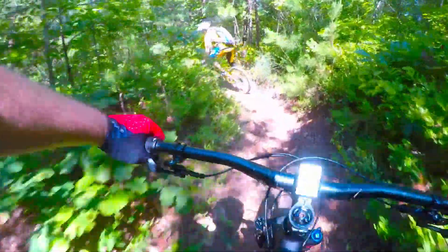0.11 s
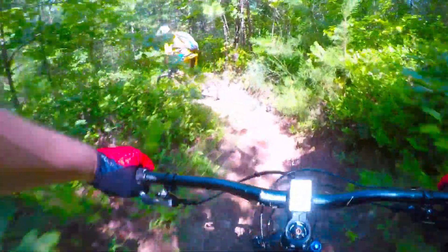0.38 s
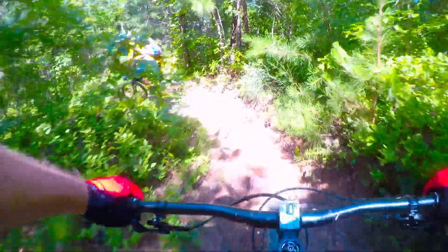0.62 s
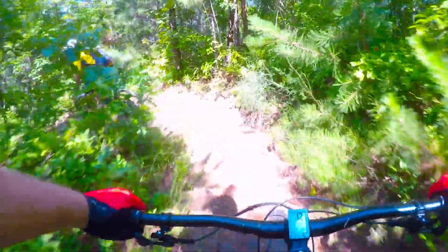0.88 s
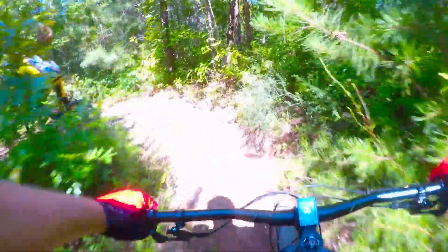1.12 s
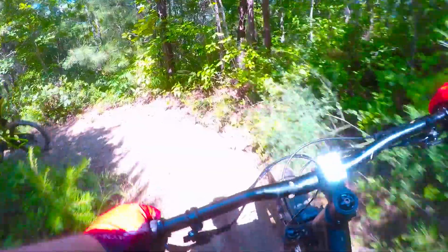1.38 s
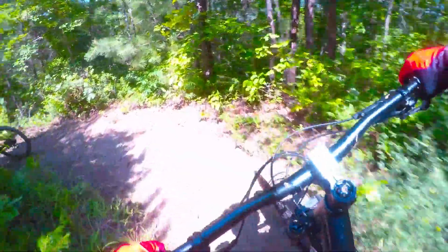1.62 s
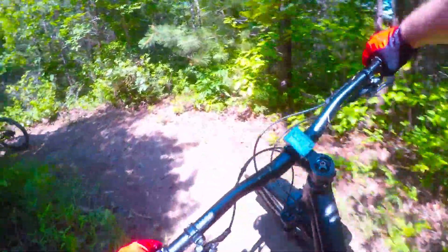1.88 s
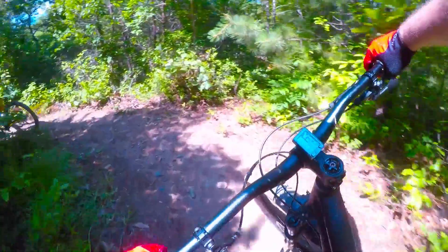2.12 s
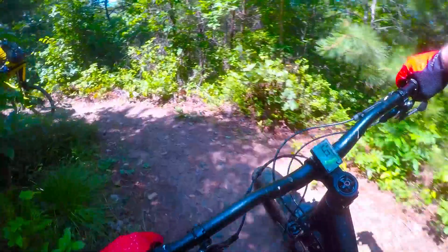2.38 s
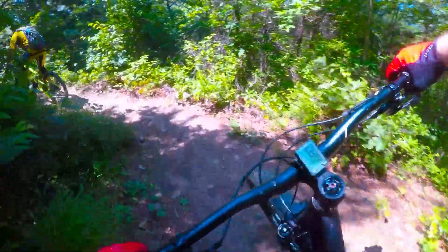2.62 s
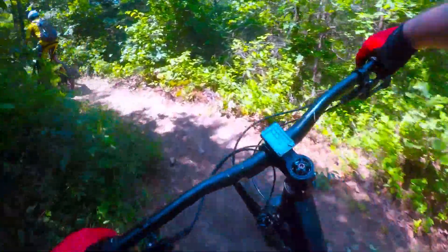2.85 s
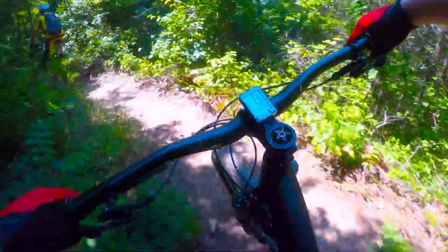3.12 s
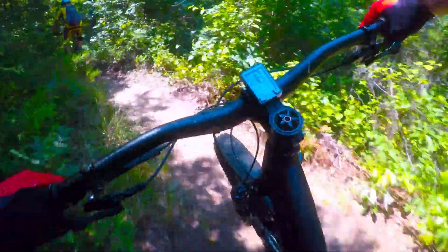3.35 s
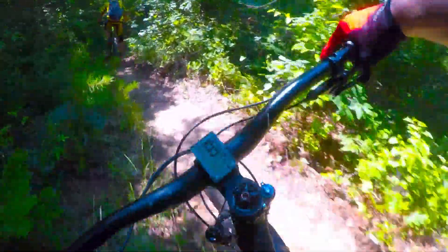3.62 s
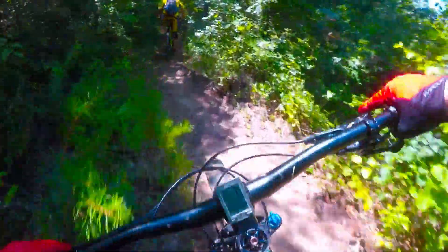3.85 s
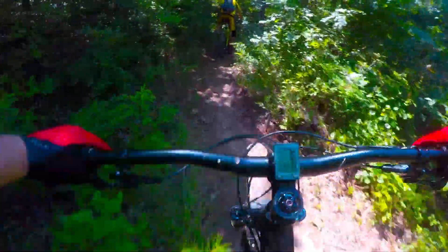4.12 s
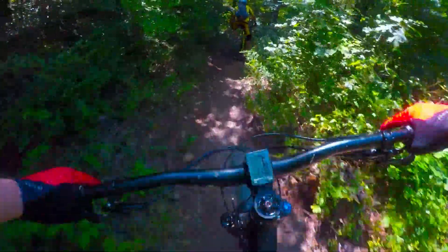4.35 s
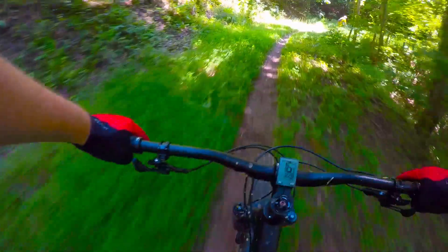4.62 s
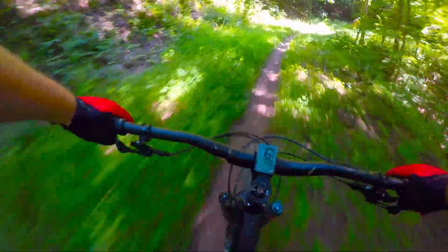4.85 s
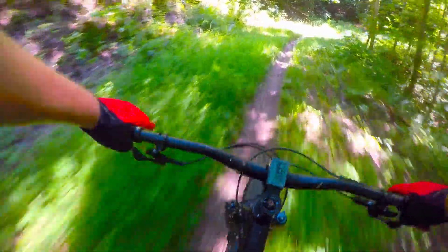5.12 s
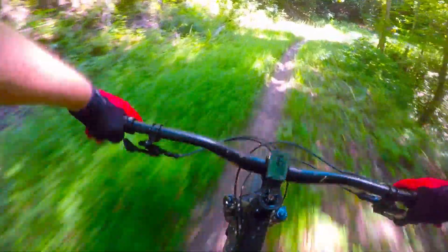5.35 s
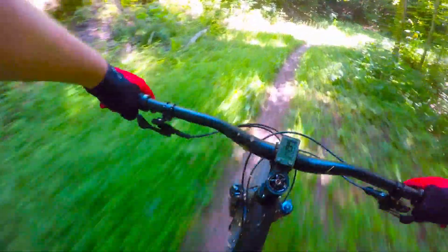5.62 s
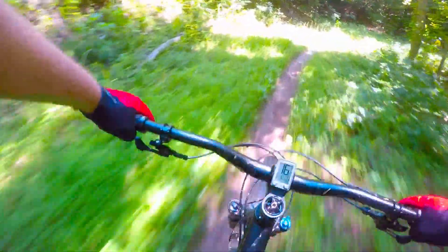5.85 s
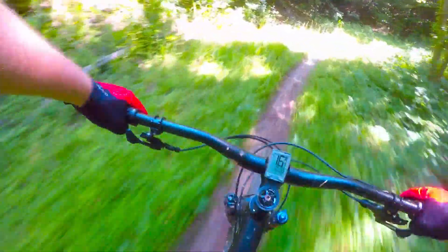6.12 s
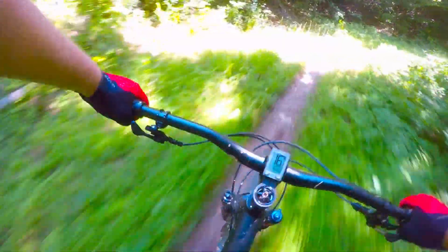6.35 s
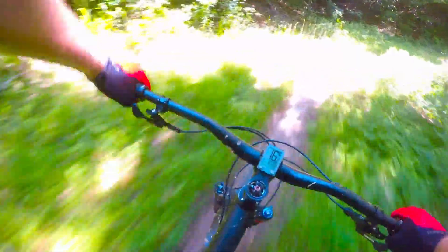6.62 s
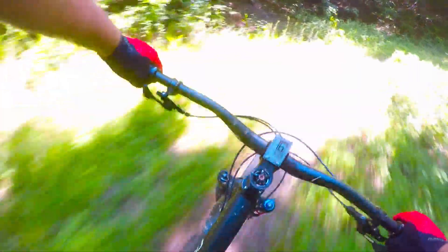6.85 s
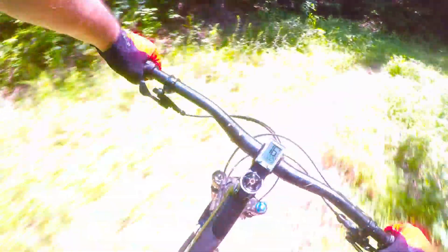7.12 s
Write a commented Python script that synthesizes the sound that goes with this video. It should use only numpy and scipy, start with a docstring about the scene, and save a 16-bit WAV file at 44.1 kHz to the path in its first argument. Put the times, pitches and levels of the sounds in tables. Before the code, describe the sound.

Close on a mountain bike from the rider's chest, outdoors in woods. Tyres crunch dirt softly, the chain whirrs, the brake chirps thinly, then the freehub ticks through a bend. Pedalling briefly returns before a hard cut to a fast straight: wind thumps heavily against the microphone, the ratchet ticks rapidly and stones knock the frame.

```python
"""A mountain bike heard from the rider's chest: a slow bend on dirt, then at 4.6 s a cut to a fast grassy straight.
The brake disc chirps (thin noise rings) over a whirring chain (resonant noise), then the freehub ticks as the
rider coasts (pulsed noise); the chain returns before the cut, and fast coasting ticks follow it.
Throughout, wind buffets the housing (low noise in puffs), knobbly tyres crunch grit (patchy noise and pops),
and stones knock the frame (decaying sines with a crack) while chain and cables slap (noise bursts)."""
import sys
import numpy as np
from scipy import signal
from scipy.fft import rfft, irfft
from scipy.io import wavfile
from scipy.ndimage import uniform_filter1d

SR = 44100
rng = np.random.default_rng(int(sys.argv[2]) if len(sys.argv) > 2 else 0)


def generate_wav(sig):
    """Save sig (samples, or channels by samples) to the path in sys.argv[1] as 16-bit PCM at SR."""
    pcm = np.round(np.clip(np.atleast_2d(sig).T, -1, 1) * 32767).astype(np.int16)
    wavfile.write(sys.argv[1], SR, pcm)


def gain_from_decibels(decibels):
    """Convert decibel values to linear amplitude factors."""
    exponent = np.asarray(decibels, float) / 20
    return 10 ** exponent


N = 318843
T = np.arange(N) / SR


def level(x, db=0):
    """Scale to an rms level."""
    return x * gain_from_decibels(db) / np.sqrt(np.mean(x ** 2))


def curves(spells):
    """Join tables in time and draw each column after the first as a curve, one value a sample."""
    s, *columns = np.vstack(spells).T
    return [np.interp(T, s, column) for column in columns]


def colour(x, points, modes=()):
    """Minimum-phase filter through (Hz, dB) points with resonance humps on top; the result has rms 1."""
    size = 8192
    f = np.arange(size // 2 + 1) * SR / size + 1
    hz, db = np.transpose(points)
    db = np.interp(np.log(f), np.log(hz), db)
    for centre, width, lift_db in modes:
        db = db + lift_db / (1 + (2 * (f - centre) / width) ** 2)
    # folding the cepstrum forward in time makes the filter causal
    cepstrum = irfft(np.log(gain_from_decibels(db)))
    cepstrum[1:size // 2] *= 2
    cepstrum[size // 2 + 1:] = 0
    impulse = irfft(np.exp(rfft(cepstrum)))
    return level(signal.fftconvolve(x, impulse[None], axes=1)[:, :N])


# how far the two channels differ: (frequency [Hz], difference against the sum [dB])
CHANNEL_DIFFERENCE = [(40, -42.5), (120, -37), (350, -28), (1000, -30.5), (2500, -27), (5000, -24.5),
                      (11600, -20), (11800, -0.5)]


def hiss():
    """Two channels of noise: nearly alike, independent above about 11.6 kHz."""
    mid, side = rfft(rng.standard_normal((2, N)))
    hz, db = np.transpose(CHANNEL_DIFFERENCE)
    f = np.arange(len(mid)) * SR / N + 1
    share = gain_from_decibels(np.interp(np.log(f), np.log(hz), db))
    opposed = share * side * np.array([[1], [-1]])
    return irfft((mid + opposed) / np.sqrt(1 + share ** 2), N)


def walk(rate):
    """Random levels held 1 / rate s and slewed twice; spread near 1."""
    hold = int(SR / rate)
    steps = np.repeat(rng.standard_normal(N // hold + 1), hold)
    return 1.28 * uniform_filter1d(uniform_filter1d(steps, hold), hold)[:N]


def strikes(times, sizes, rise_s, t60_s):
    """Envelope of blows: a short rise, then an exponential fall, cut after 4096 samples."""
    spikes = np.bincount(np.clip((times * SR).astype(int), 0, N - 1), sizes, N)
    t = np.arange(4096) / SR
    blow = (1 - np.exp(-t / rise_s)) * 1000. ** (-t / t60_s)
    return signal.fftconvolve(spikes, blow)[:N]


def add(out, s, sound):
    """Mix a short sound in at time s."""
    i = int(s * SR)
    out[..., i:i + sound.shape[-1]] += sound[..., :N - i]


def band(x, hz, width):
    """Steep band-pass: a resonance applied twice, gain 1 at the centre."""
    b, a = signal.iirpeak(hz, hz / width, SR)
    return signal.lfilter(b, a, signal.lfilter(b, a, x))


# wind on the housing, slow bend then fast straight:
# (time [s], buffet level [dB], flutter level [dB], whoosh level [dB])
WIND_LEVELS = [
    [(0.0, -36.5, -41, -52), (0.3, -36, -42, -57.5), (0.72, -32, -41.5, -52), (0.8, -39, -44, -50.5),
     (1.1, -32, -39.5, -48.5), (1.25, -28, -34, -44.5), (1.4, -34, -40, -46), (1.75, -33, -42, -52),
     (2.4, -36.5, -43, -52.5), (3.0, -33, -42, -45.5), (3.4, -33, -40.5, -51), (3.8, -30, -42.5, -50.5),
     (4.05, -35.5, -41, -54), (4.27, -29, -35.5, -49), (4.46, -42, -43, -51), (4.59, -38, -39, -52)],
    [(4.6, -19, -24.5, -41), (4.63, -18, -24.5, -40), (4.77, -23.5, -23.5, -43.5),
     (4.93, -13.5, -23.5, -38), (5.12, -24, -22, -41.5), (5.26, -13, -18, -32), (5.42, -22, -27.5, -37.5),
     (5.92, -17, -23, -38.5), (6.3, -19, -20, -36.5), (6.47, -14, -23, -37.5), (6.62, -18.5, -22, -39),
     (6.76, -11, -20, -38), (6.84, -23.5, -22, -33.5), (6.95, -14, -23.5, -35.5), (7.23, -19, -26, -35.5)],
]
# spectra of the three wind layers: (frequency [Hz], relative density [dB per Hz])
BUFFET_SPECTRUM = [(5.9, -39.5), (10, -1), (37, 1.5), (100, -8.5), (130, -42), (220, -120)]
FLUTTER_SPECTRUM = [(47, -27), (80, -2.5), (176, -2), (290, -17.5), (380, -48), (640, -120)]
WHOOSH_SPECTRUM = [(150, -25), (250, 2.5), (361, -5), (451, -13), (505, -15), (540, -38.5), (700, -51.5),
                   (1190, -120)]


def wind():
    """Eddies press on the housing: slow buffets, a faster flutter in puffs and a whoosh over the ports."""
    puff_db, puffs_per_s = 1, 9.  # spread and pace of the random puffs in the buffets
    buffet_db, flutter_db, whoosh_db = curves(WIND_LEVELS)
    buffet = colour(gain_from_decibels(puff_db * walk(puffs_per_s)) * hiss(), BUFFET_SPECTRUM)
    flutter = colour(gain_from_decibels(1.3 * walk(30) + 0.76 * walk(puffs_per_s)) * hiss(), FLUTTER_SPECTRUM)
    whoosh = colour(gain_from_decibels(1.0 * walk(40) + 3.1 * walk(puffs_per_s)) * hiss(), WHOOSH_SPECTRUM)
    return gain_from_decibels(buffet_db) * buffet + gain_from_decibels(flutter_db) * flutter + gain_from_decibels(whoosh_db) * whoosh


# tyre roar on the ground, slow then fast: (time [s], level [dB])
ROAR_LEVELS = [(0.0, -47.5), (0.92, -52), (1.5, -46), (1.77, -51.5), (2.16, -51), (2.91, -55), (3.96, -50),
               (4.58, -49.5), (4.6, -47.5), (5.5, -42), (5.88, -45), (7.23, -40.5)]
# tyre roar spectrum: (frequency [Hz], relative density [dB per Hz])
ROAR_SPECTRUM = [(240, -26.5), (400, 0.5), (499, -10.5), (555, -22), (635, -14.5), (856, -10),
                 (1100, -22.5), (1450, -9), (1590, -12), (2120, -9.5), (3460, -22.5), (4000, -19.5),
                 (5200, -48), (8800, -120)]


def tyre_roar():
    """Knobs roll on grit: noise whose level wanders patchily."""
    roar_db, = curves([ROAR_LEVELS])
    return gain_from_decibels(roar_db) * colour(gain_from_decibels(1.93 * walk(25)) * hiss(), ROAR_SPECTRUM)


# loose stones under the wheels: (time [s], gain on the pops [dB])
STONE_LEVELS = [(0.0, -58), (0.52, -53), (0.58, -45.5), (1.08, -51), (1.29, -43.5), (1.53, -50), (1.9, -58),
                (2.0, -44), (2.45, -53.5), (2.75, -54), (3.1, -50.5), (3.3, -48.5), (3.8, -49.5),
                (4.0, -45), (4.5, -80), (4.89, -42.5), (5.7, -50), (6.14, -45.5), (7.23, -40)]


def loose_stones():
    """Small stones pop out and ring the rim in two bands, louder after each knock on the frame."""
    flurry_db, flurries_per_s = 1.5, 14.
    scatter_db, scatter_rise_s, scatter_t60_s = -18, .004, .12  # thrown stones, against the knock's level
    chance = rng.standard_normal((1600, 2))
    times = np.linspace(0, N / SR, len(chance)) + 0.00995 * chance[:, 0]
    grit = strikes(times, gain_from_decibels(3.2 * chance[:, 1]), .0006, .016)
    low_pops = level(band(grit * hiss(), 1510.0, 516.0), -5)
    high_pops = level(band(grit * hiss(), 2630.0, 670.0), -11.5)
    knock_s, knock_db, _ = np.transpose(FRAME_KNOCKS)
    thrown = strikes(knock_s, gain_from_decibels(knock_db + scatter_db), scatter_rise_s, scatter_t60_s)
    loose = gain_from_decibels(curves([STONE_LEVELS])[0] + flurry_db * walk(flurries_per_s))
    return np.hypot(loose, thrown) * (low_pops + high_pops)


# coasting spells, distance rolled: (time [s], ratchet teeth passed [count])
SLOW_COAST = [(1.2019, 1), (1.4028, 7), (1.7434, 16), (1.9503, 22), (2.1724, 28), (2.3709, 34), (2.699, 43),
              (2.9986, 52), (3.4517, 67), (3.6472, 73), (3.7266, 76)]
FAST_COAST = [(4.5987, 77), (4.7572, 87), (5.1944, 117), (5.6121, 147), (6.0556, 177), (7.24, 262)]


def ratchet():
    """Times of every tooth passed, and a 0-1 curve of when the pedals rest."""
    times, coasting = [], np.zeros(N)
    for spell in SLOW_COAST, FAST_COAST:
        s, teeth = np.transpose(spell)
        times.append(np.interp(np.arange(teeth[0], teeth[-1] + 1), teeth, s))
        coasting[(T > s[0] - .012) & (T < s[-1] - .01)] = 1
    return np.concatenate(times), uniform_filter1d(coasting, 600)


def pawl_ticks(times, scatter_db, t60_s, steady):
    """Three pawls a tooth, each drop with its own strength, over a steady part; mean power 1 at any pace."""
    spread_s, rise_s = .0025, .002
    chance = rng.standard_normal((len(times), 3, 2))
    when = times[:, None] + spread_s * chance[..., 0]
    sizes = gain_from_decibels(scatter_db * chance[..., 1])
    drops = strikes(when.ravel(), sizes.ravel(), rise_s, t60_s) + steady
    return drops / np.sqrt(uniform_filter1d(drops ** 2, 10000))


# ringing parts of the hub: (frequency [Hz], width [Hz], relative level [dB])
HUB_RINGS = [(4680, 290, 3), (5150, 770, 5.5), (5780, 560, -0.5), (6830, 110, -1.5), (7980, 33, -13)]
# hub spectrum: (frequency [Hz], relative density [dB per Hz])
HUB_SPECTRUM = [(1940, -36.5), (3300, -10), (4280, -2), (4780, -0.5), (5600, -2), (6770, -4.5),
                (7230, -5.5), (10000, -18.5), (13000, -49), (22000, -120)]


def freehub(times, drops):
    """The pawls drop over each tooth a little apart and ring the hub; its shell answers lower down."""
    rings = 0
    for hz, width, db in HUB_RINGS:
        ticks = pawl_ticks(times, 6.5, .026, .2)
        rings = rings + level(band(ticks * hiss(), hz, width), db)
    hub = colour(drops * hiss(), HUB_SPECTRUM) + level(rings, 0.2)
    shell = level(band(drops * hiss(), 2300., 1260.0), -12.5)
    return gain_from_decibels(-4.5) * hub + shell


# chain spectrum: (frequency [Hz], relative density [dB per Hz])
CHAIN_SPECTRUM = [(1940, -20), (3300, -3), (4780, 4), (5650, 7), (6620, -0.5), (7930, 2.5), (10000, -29),
                  (13000, -37), (22000, -120)]
# ringing parts of the chain: (frequency [Hz], width [Hz], lift over the spectrum [dB])
CHAIN_RINGS = [(5500, 55, 1.4), (5860, 140, 4.5), (6630, 360, 9.5), (6420, 60, 1.4), (7870, 280, 2.7),
               (13000, 490, 3.1)]


def chain():
    """The chain runs on the cogs: flickering noise with resonances."""
    return colour(gain_from_decibels(1.57 * walk(60)) * hiss(), CHAIN_SPECTRUM, CHAIN_RINGS)


# pedalling, coasting, pedalling, coasting fast: (time [s], drivetrain gain [dB], finest treble level [dB])
DRIVE_LEVELS = [(0.0, -46, -55), (0.28, -45, -54.5), (1.12, -45, -55.5), (1.19, -46, -59.5),
                (1.49, -43.5, -58), (1.75, -47.5, -58.5), (2.38, -46, -59), (2.7, -49, -59.5),
                (3.7, -46, -58), (3.75, -43.5, -51), (4.42, -47, -55), (4.57, -44.5, -53),
                (4.6, -46, -59.5), (5.3, -44.5, -56.5), (5.81, -45, -58.5), (6.03, -43, -57),
                (6.5, -44.5, -56), (7.23, -41.5, -55)]
# finest treble spectrum: (frequency [Hz], relative density [dB per Hz])
SHEEN_SPECTRUM = [(6000, -14.5), (9000, 4), (11000, -2.5), (13000, 4), (15400, -1), (16000, -59)]


def drivetrain():
    """The freehub ticks while coasting, the chain whirrs otherwise; a fine treble sheen follows either."""
    drive_db, sheen_db = curves([DRIVE_LEVELS])
    times, coasting = ratchet()
    drops = pawl_ticks(times, 4.0, .03, 1.)
    sheen = colour((coasting * drops + 1 - coasting) * hiss(), SHEEN_SPECTRUM)
    gears = coasting * freehub(times, drops) + (1 - coasting) * chain()
    return gain_from_decibels(drive_db) * gears + gain_from_decibels(sheen_db) * sheen


# stones and roots knock the frame: (time [s], level [dB], ring pitch [Hz])
FRAME_KNOCKS = [(0.4828, -32, 2420), (0.853, -30, 1560), (1.09, -32.5, 1760), (1.1985, -29.5, 1610),
                (1.251, -29, 1470), (1.2684, -38, 1500), (1.287, -27.5, 1480), (1.4524, -25, 1940),
                (1.5161, -23.5, 1700), (2.665, -29.5, 1460), (2.756, -34, 1420), (2.835, -43, 1390),
                (2.866, -32, 1460), (2.92, -30, 1410), (2.964, -35, 1390), (3.505, -32, 1570),
                (4.9247, -29, 1850), (5.116, -30, 1760), (5.249, -25, 1560), (5.4058, -14.5, 2510),
                (5.53, -26, 1470), (5.6118, -18, 1980), (6.2752, -26, 1630), (6.5368, -25, 1480),
                (6.566, -24, 1540), (6.8538, -14, 1400), (6.962, -21.5, 1770)]


def knocks():
    """Stones and roots ring the frame for a few cycles, with a noisy crack at that pitch and a low thud."""
    thud_db, thud_hz, rise_s, t60_s = -12, 750., .0009, .014  # thud against the ring
    crack_db, crack_width = -5, .9  # width as a share of the pitch
    out, t, noise = np.zeros((2, N)), np.arange(4096) / SR, hiss()
    envelope = (1 - np.exp(-t / rise_s)) * 1000. ** (-t / t60_s)
    thud = gain_from_decibels(thud_db) * np.sin(2 * np.pi * thud_hz * t)
    for s, db, hz in FRAME_KNOCKS:
        burst = noise[:, int(s * SR):][:, :len(t)]
        crack = level(band(burst, hz, crack_width * hz), crack_db)
        ring = np.sin(2 * np.pi * hz * t)
        add(out, s, gain_from_decibels(db) * envelope * (ring + crack + thud))
    return out


# chain and cables slap:
# (time [s], rattle level [dB], bright snap against the rattle [dB], decay time constant [s])
CABLE_SLAPS = [(0.121, -35, 2, 0.0069), (1.091, -33, 4, 0.0049), (1.394, -32, -19.5, 0.018),
               (1.427, -37, -22, 0.008), (1.448, -26, -20, 0.015), (1.52, -42, -14, 0.016),
               (1.705, -36, -1, 0.0069), (5.194, -31, -12, 0.0041), (5.283, -32.5, -25, 0.0066),
               (5.29, -38, -21, 0.008), (5.405, -27, -1, 0.0044), (5.451, -32.5, -14, 0.0061),
               (5.597, -43, -20, 0.0032), (5.853, -34, 7, 0.013), (6.556, -36, -18, 0.015),
               (6.706, -34, -18, 0.012), (6.831, -39, 6, 0.008), (7.042, -39, -23, 0.011)]


def slaps():
    """Chain and cables slap: a short rattle with the hub's colour and a brighter, quicker snap."""
    rise_share = 0.21  # rise time as a share of the decay time
    out, t, noise = np.zeros((2, N)), np.arange(4096) / SR, hiss()
    rattle, bright = colour(noise, HUB_SPECTRUM), band(noise, 8200.0, 7500.0)
    for s, db, bright_db, length in CABLE_SLAPS:
        at = slice(int(s * SR), int(s * SR) + len(t))
        decay_s = max(length, .001)
        envelope = (1 - np.exp(-t / (rise_share * decay_s))) * np.exp(-t / decay_s)
        add(out, s, gain_from_decibels(db) * rattle[:, at] * envelope)
        add(out, s, gain_from_decibels(db + bright_db) * bright[:, at] * np.exp(-t / 0.0015))
    return out


# brake disc chirps: (time [s], level before the envelope [dB], pitch [Hz])
BRAKE_CHIRPS = [(0.0044, -41, 13400), (0.2478, -42.5, 13300), (0.8365, -47.5, 13000), (0.9662, -45, 13100),
                (1.3708, -39.5, 13100), (1.4765, -42.5, 13300), (1.5844, -54, 13000), (1.708, -56, 13000)]


def chirps():
    """The brake disc chirps: thin, very high rings of narrow noise."""
    rise_s, t60_s = 0.0013, 0.094
    out, t, noise = np.zeros((2, N)), np.arange(4096) / SR, hiss()
    envelope = (1 - np.exp(-t / rise_s)) * 1000. ** (-t / t60_s)
    for s, db, hz in BRAKE_CHIRPS:
        rub = band(noise[:, int(s * SR):][:, :len(t)], hz, 260.)
        add(out, s, level(rub, db) * envelope)
    return out


# a narrow hiss, perhaps a dragging brake pad: (start [s], end [s], level [dB])
DRAG_SPELLS = [(4.608, 4.904, -48.5), (5.898, 6.207, -50.5)]


def drag():
    """Steady rubbing near the lowest hub mode: it sets in at once and fades out after its end."""
    fade_s = 0.019
    press = np.zeros(N)
    for start, end, db in DRAG_SPELLS:
        fade = np.exp(-np.clip(T - end, 0, None) / fade_s)
        press += gain_from_decibels(db) * (T > start) * fade
    return press * level(band(hiss(), 4600.0, 660.0))


def scene():
    """All sources as they reach the rider's chest."""
    ground = tyre_roar() + loose_stones()
    hits = knocks() + slaps() + chirps()
    return wind() + ground + drivetrain() + hits + drag()


def band_limit(x):
    """A steep low-pass at the top of the band."""
    return signal.sosfilt(signal.butter(12, 15700, fs=SR, output="sos"), x)


def record(dry):
    """The capsule rounds the strongest gusts; the top treble is cut."""
    rounded = np.tanh(1.36 * dry) / 1.045
    treble_cut = signal.ellip(10, .2, 70, 15400, fs=SR, output="sos")
    mix = signal.sosfilt(treble_cut, rounded)
    return band_limit(mix)


dry = scene()
out = record(dry)
generate_wav(out)
```